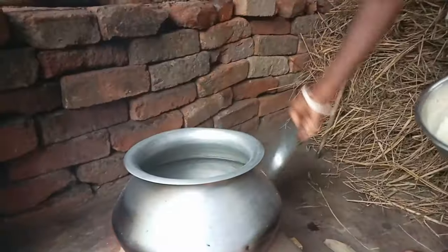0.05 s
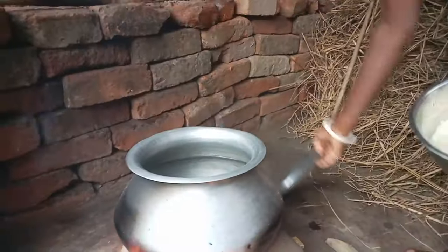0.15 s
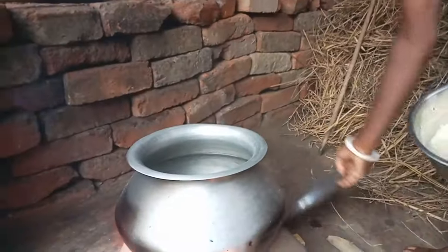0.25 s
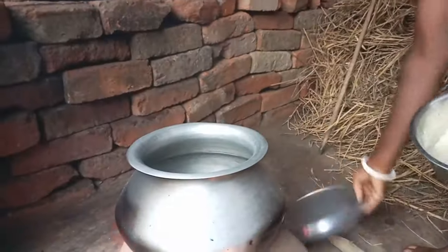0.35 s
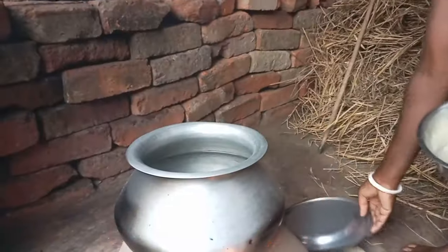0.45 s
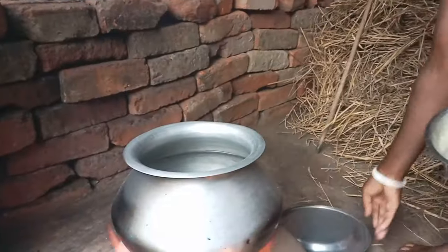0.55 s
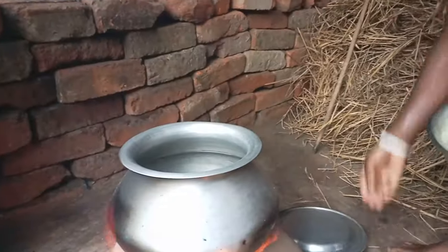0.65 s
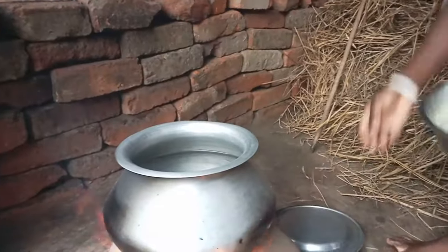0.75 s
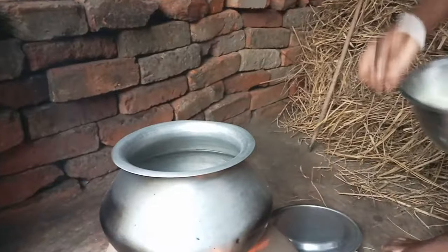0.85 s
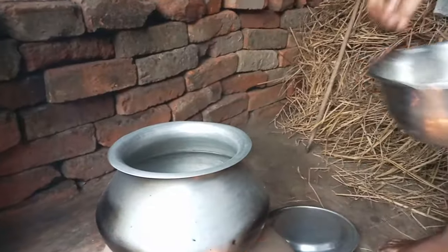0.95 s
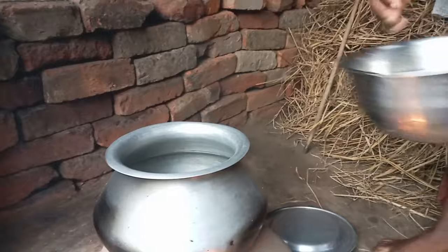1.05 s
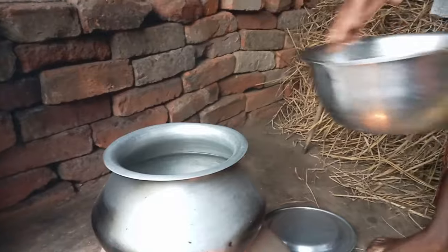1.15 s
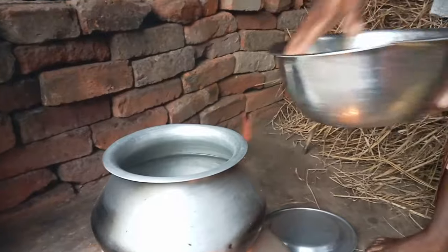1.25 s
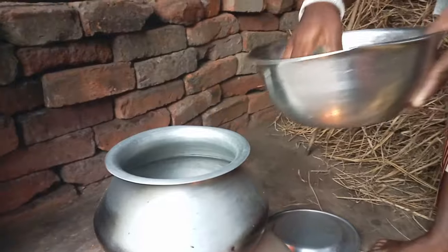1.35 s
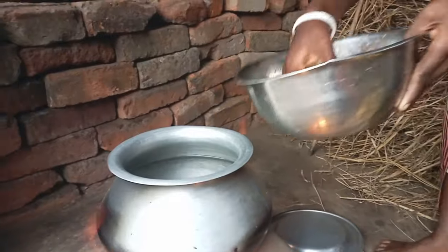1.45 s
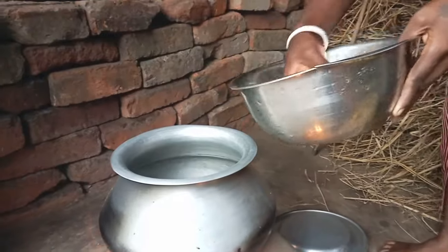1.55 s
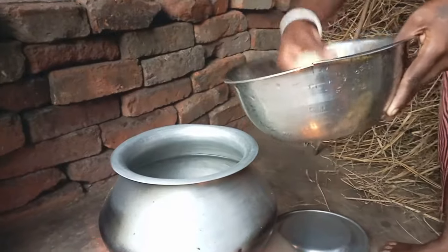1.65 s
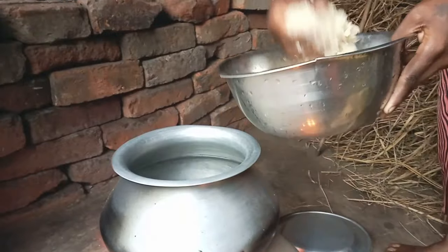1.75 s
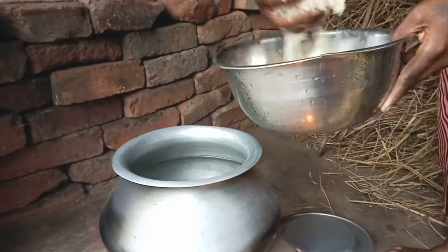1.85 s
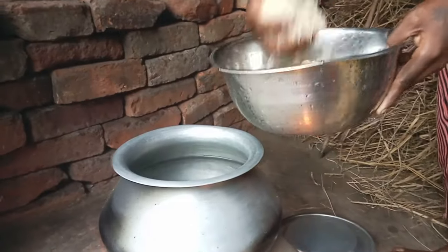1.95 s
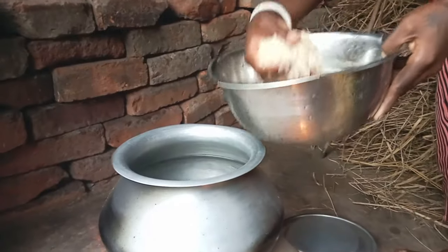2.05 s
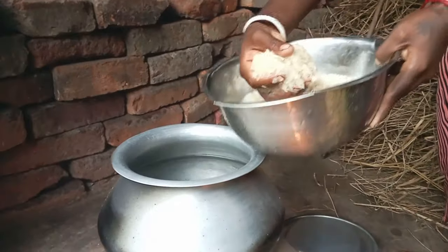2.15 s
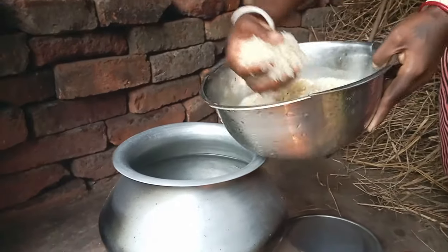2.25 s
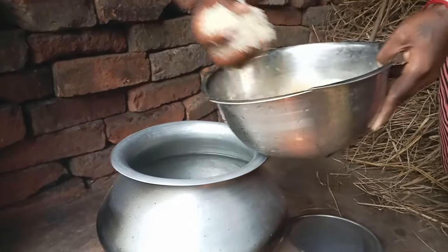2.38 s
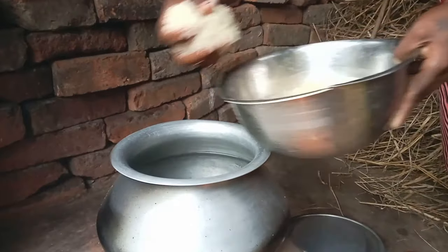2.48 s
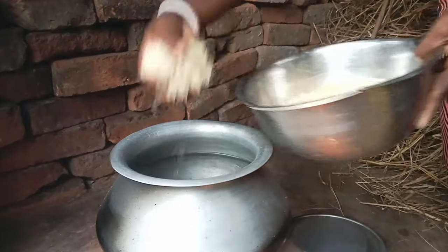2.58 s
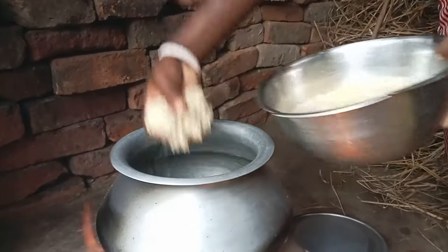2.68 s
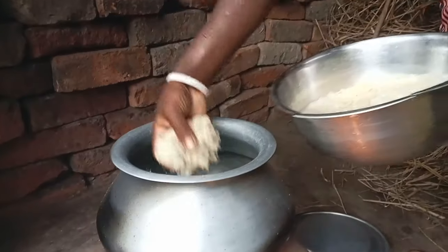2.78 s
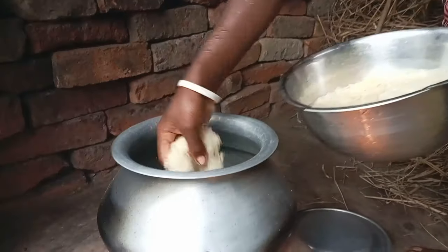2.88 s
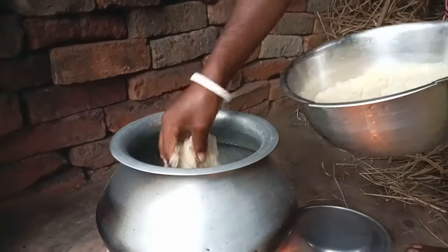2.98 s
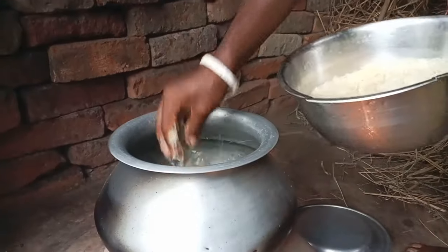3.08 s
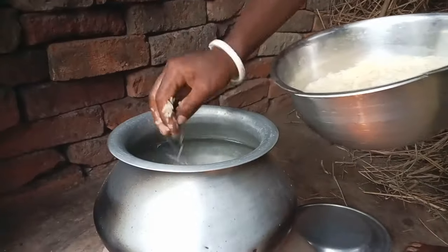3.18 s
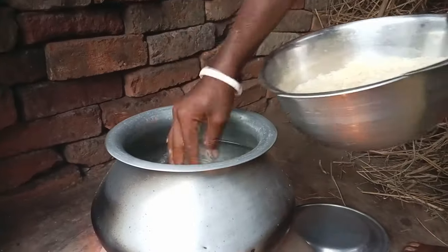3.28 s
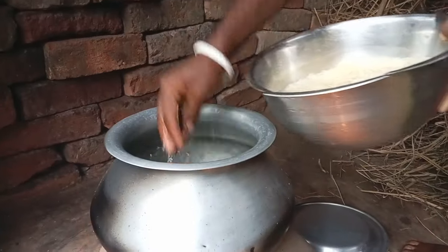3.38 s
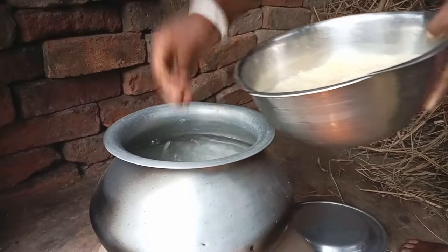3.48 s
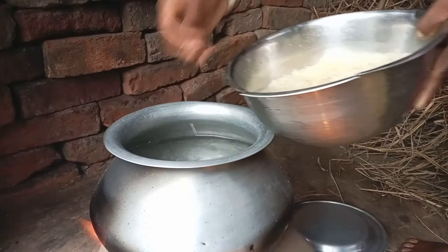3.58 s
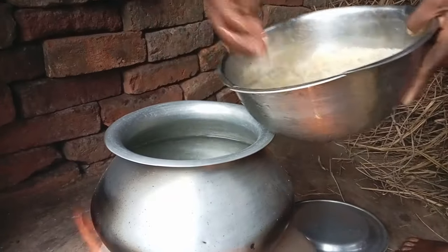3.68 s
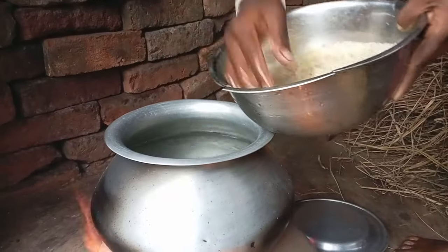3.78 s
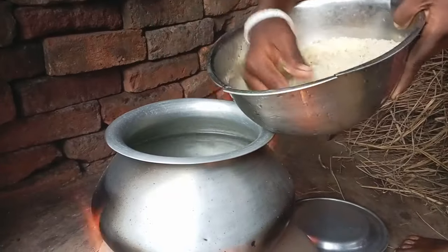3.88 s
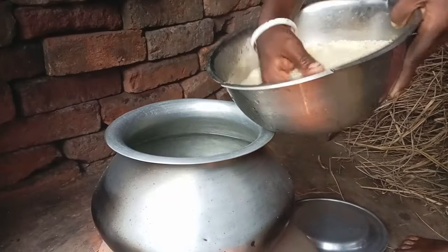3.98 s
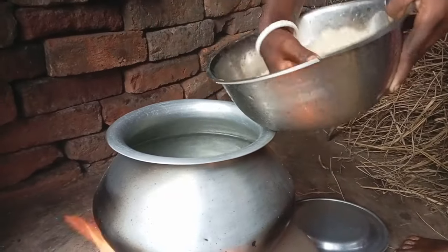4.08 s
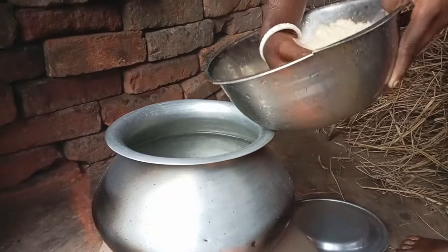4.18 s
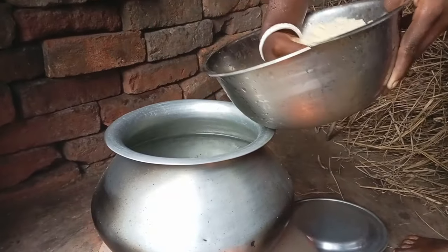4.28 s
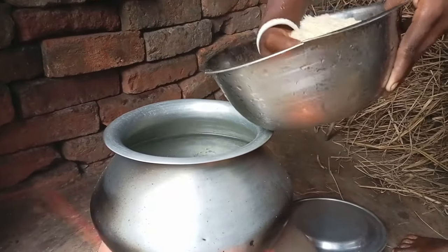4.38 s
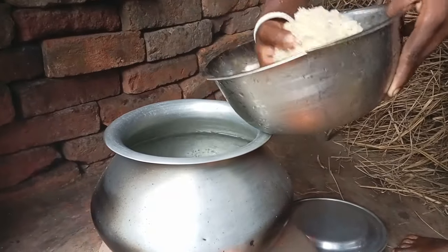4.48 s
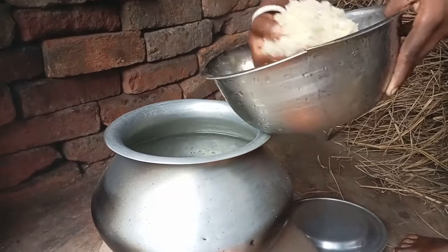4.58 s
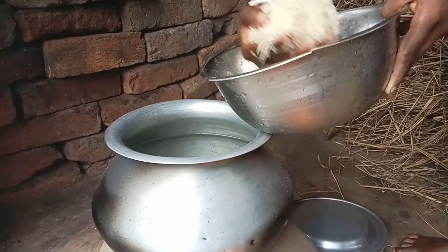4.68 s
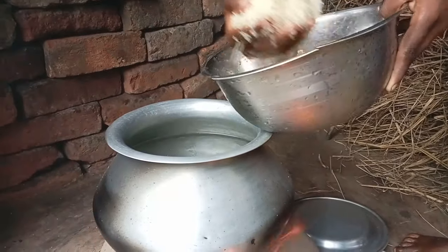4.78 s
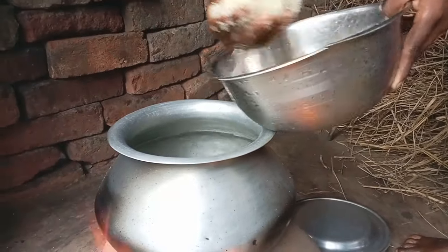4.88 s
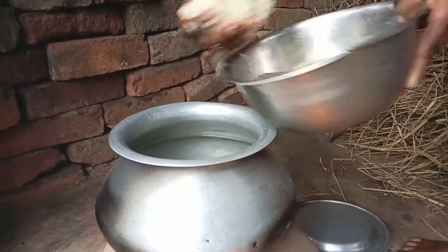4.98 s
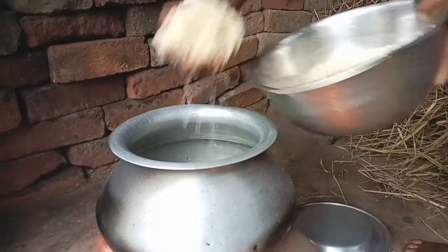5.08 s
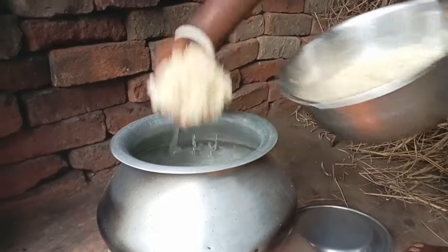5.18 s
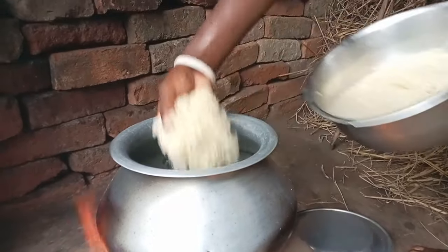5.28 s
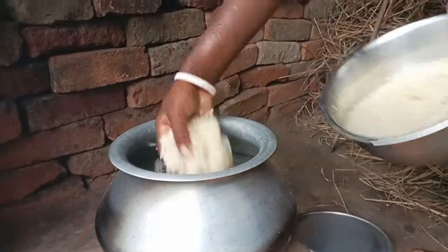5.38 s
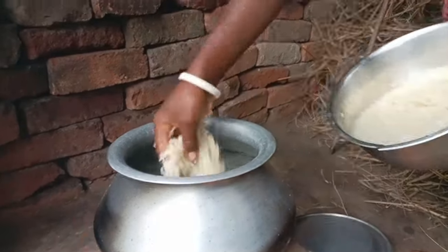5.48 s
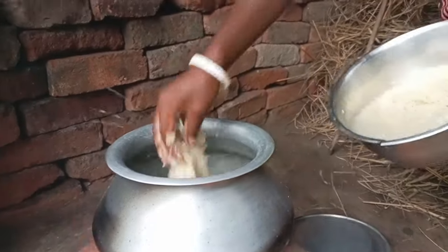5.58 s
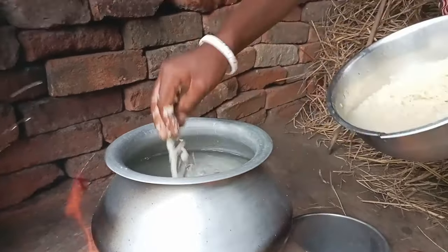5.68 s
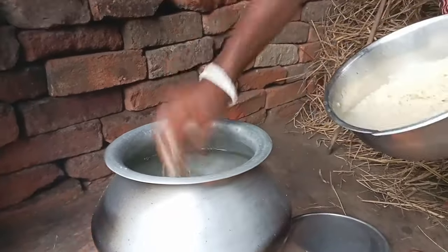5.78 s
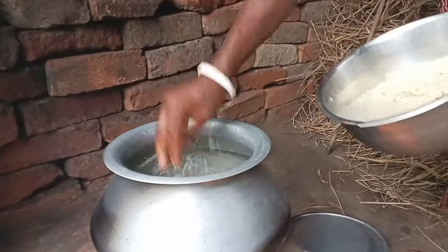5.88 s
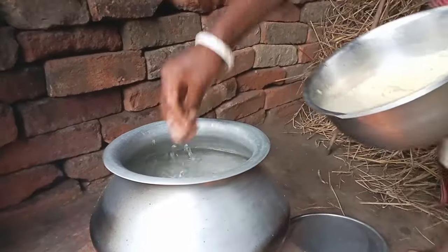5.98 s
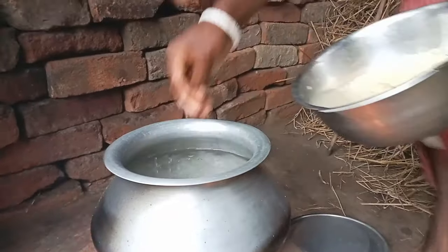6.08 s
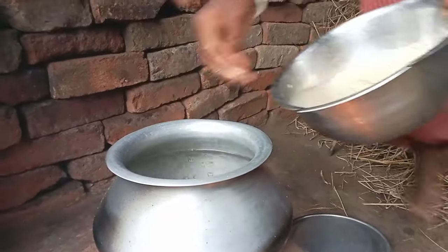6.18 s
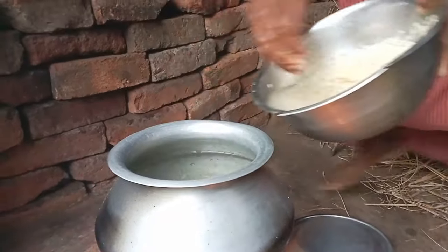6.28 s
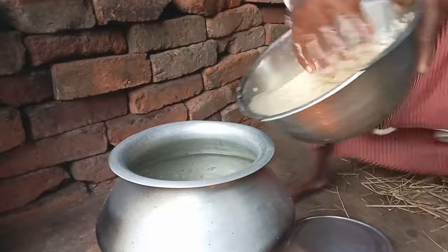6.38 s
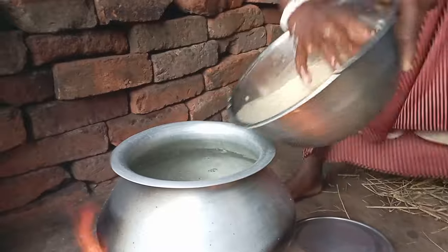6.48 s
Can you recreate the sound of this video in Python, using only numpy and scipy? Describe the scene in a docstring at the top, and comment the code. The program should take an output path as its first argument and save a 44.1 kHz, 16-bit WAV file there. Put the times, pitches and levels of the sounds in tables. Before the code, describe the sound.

Close to the microphone, a metal lid knocks the pot at 0.1 s, then hits the earth floor at about 0.45 s with a loud, noisy clank, bouncing and settling by 0.7 s. Low fire rumble and gentle hiss continue throughout. From 1.2 s a hand rustles softly in wet rice, with small ticks, drips and faint bowl touches. Around 2.8-3.0 s a handful enters the water with light, crisp splats; drips, little plops and runoff follow until 3.9. At 4.3 a bangle clinks the steel bowl sharply, then grains rustle and spatter. From 5.2 to 5.8 comes the fullest splash: dense wet splats, bright spray and rounded bubble plops. Drips thin out, then a sharp wet slap and bowl knock arrive at 6.4. Soft low thuds sound far off near 0.9, 2.6, 4.3 and 6.1, with faint hoots at 2.4 and 3.4. Dull, short brick echoes.

```python
"""A metal lid knocks its pot and is dropped on the earth floor, where it bounces: ringing modes and noisy cracks.
Near by, a hand scoops wet rice from a steel bowl into water: rustling clicks, noise splats, gliding bubble tones,
and a bangle that rings the bowl's modes. A brick corner gives the near sounds a short tail of dull echoes.
A wood fire rumbles and hisses as bands of noise; far off, low notes thud at a slow, even pace and faint hoots sound."""
import sys
import numpy as np
from scipy import signal
from scipy.fft import rfft, irfft
from scipy.io import wavfile

SR = 44100
rng = np.random.default_rng(int(sys.argv[2]) if len(sys.argv) > 2 else 0)


def inscribe(sig):
    """Save sig as 16-bit PCM at rate SR to the path in sys.argv[1].

    A 1-D sig is mono; a 2-D sig holds one channel per row.
    Samples are clipped to [-1, 1] before scaling.
    """
    pcm = np.round(np.clip(np.atleast_2d(sig).T, -1, 1) * 32767)
    wavfile.write(sys.argv[1], SR, pcm.astype(np.int16))


N = 288414


def from_db(db):
    """Decibels to gain."""
    return 10 ** (np.asarray(db) / 20)


def rms_one(x):
    """Scaled to rms 1."""
    return x / np.sqrt(np.mean(x ** 2) + 1e-20)


def time_axis(length_s):
    """Seconds from the start of a sound."""
    return np.arange(round(length_s * SR)) / SR


def add(out, s, sound):
    """Mixes a sound in at a time in seconds."""
    i = round(s * SR)
    out[i:i + len(sound)] += sound[:N - i]


def dying(t, t60):
    """Exponential decay by 60 dB in t60 seconds, t60 kept between 3 ms and 3 s."""
    return from_db(-60 * t / np.clip(t60, .003, 3))


def at_hz(points, hz):
    """A spectrum in dB read on a log-frequency axis."""
    point_hz, point_db = np.array(points).T
    return np.interp(np.log(hz), np.log(point_hz), point_db)


def colour(x, points):
    """Minimum-phase filter with the given spectrum, so that nothing sounds early."""
    size = 4096
    bin_hz = np.arange(size + 1) * SR / 2 / size
    cepstrum = irfft(np.log(from_db(at_hz(points, np.maximum(bin_hz, 1)))))
    # folding the cepstrum onto positive time makes the phase minimal
    cepstrum[1:size] *= 2
    cepstrum[size + 1:] = 0
    response = irfft(np.exp(rfft(cepstrum)))[:size]
    return signal.oaconvolve(x, response)[:len(x)]


def drift(rate):
    """Slow random wander of spread 1; a higher rate wanders faster."""
    r = np.exp(-80 * np.pi * rate / SR)   # one step is 40 samples
    noise = rng.standard_normal(N // 40 + 2002)
    slow = signal.lfilter([1], [1, -2 * r, r * r], noise)[2000:]
    return np.interp(np.arange(N) / 40, np.arange(len(slow)), rms_one(slow - slow.mean()))


def roughness(shape):
    """Low-passed noise that makes a ring uneven."""
    return signal.lfilter([.03], [1, -.97], rng.standard_normal(shape))


def grains(per_s, uneven_db, clump_db, clump_rate):
    """Random clicks of uneven size and either sign that come in clumps."""
    sizes = from_db(uneven_db * np.minimum(rng.exponential(1, N), 5)) * rng.choice([-1, 1], N)
    strikes = rng.random(N) < per_s / SR
    return sizes * strikes * from_db(clump_db * drift(clump_rate))


def bubbles(per_s, low_hz, high_hz, cycles):
    """Random bursts dealt to 12 resonators that each fall 60 dB in the given cycles; rms 1."""
    clicks = grains(per_s, uneven_db=2.5, clump_db=-1.0, clump_rate=54) + 1e-18
    dealt = rng.integers(0, 12, N)
    out = 0
    for k, hz in enumerate(np.geomspace(low_hz, high_hz, 12)):
        r = from_db(-60 * hz / (cycles * SR))
        w = 2 * np.pi * hz / SR
        own_clicks = clicks * (dealt == k) + 1e-18
        out = out + signal.lfilter([0, np.sin(w)], [1, -2 * r * np.cos(w), r * r], own_clicks)
    return rms_one(out)


def soft_tone(length, hz):
    """A sine that swells and fades over its length in seconds."""
    t = time_axis(length)
    return np.sin(2 * np.pi * hz * t) * np.sin(np.pi * t / length) ** .7


# The lid's modes. Each row: pitch in Hz, level knocked on the rim in dB, level dropped flat in dB, t60 in s.
LID_MODES = [(163.5, -8.5, -35, 0.2), (222.7, -8.5, -34, 0.087), (270.7, -8, -32, 0.18),
             (359, -11.5, -24.5, .15), (523, -6.5, 0, 0.076), (678.5, 0.5, -1, 0.29),
             (907, -33.5, -40, 0.74), (1000, -27, -43, 0.32), (1080, -15, -9.5, 0.075),
             (1204, -22.5, -6.5, 0.22), (1385, -44.5, -45.5, 0.89), (1546, -40.5, -18.5, 0.16),
             (1730, -29.5, -42, 0.56), (1815, -50, -37, 0.58), (1880, -63.5, -36, 0.99),
             (2040, -52.5, -30.5, 0.5), (2370, -51.5, -34.5, 0.85), (2510, -38.5, -36, 0.16),
             (2880, -38, 0.5, 0.1), (3040, -33.5, -12.5, 0.17), (3063, -39, -26, 0.52),
             (3327, -46.5, -31.5, 0.033), (3381, -42, -32.5, 0.31), (3720, -44, -5, 0.11),
             (4020, -43, -25.5, 0.22), (4130, -39.5, -28.5, 0.17), (4880, -59.5, -27, 0.07),
             (5640, -54, -43, .08)]
# The lid's contacts. Each row: start in seconds, ring level in dB, flatness from 0 to 1,
# tilt in dB per octave, crack level in dB, swell in s (at 683 Hz), time until the next touch chokes the ring in s.
LID_CONTACTS = [(0.1226, -9, 0.05, 4, -16, 0.00015, 0.11), (.222, -35.5, 0.9, 0.5, -50, 0.0043, 0.055),
                (0.273, -32, 0.41, 7.5, -48, 0.0036, 0.0074), (0.463, 1, 0.58, 2.5, 4, 0.0068, 0.058),
                (.521, -13.5, 0.8, 3.5, -2, 0.00079, 0.012), (.527, -15.5, 0.81, 6, 0.5, 0.0047, 0.014),
                (.548, -11.5, 0.8, -1.5, -9.5, 0.0041, 0.033), (.612, -22, 0.5, 4.5, -44, 0.0044, 0.054)]
CRACK_SPECTRUM = [(70, -40.5), (250, -13), (700, -4.5), (2200, -22.5), (3300, 3.5), (5000, -14.5),
                  (8000, -37.5), (11000, -36), (16000, -43)]   # (Hz, relative dB)


def lid():
    """Each contact cracks and rings the modes; a touch damps mostly the low modes, the high ones beat."""
    out, t = np.zeros(N), time_axis(.7)
    hz, rim_db, flat_db, t60 = np.transpose(LID_MODES)[:, :, None]
    held = 1 / (1 + (hz / 1900) ** 4) * (t60 < .6)   # modes that move the lid's edge most
    for s, db, flat, tilt_db, crack_db, swell, free in LID_CONTACTS:
        blow_db = rim_db + np.clip(flat, 0, 1) * (flat_db - rim_db)
        levels = from_db(db + blow_db + tilt_db * np.log2(hz / 683))
        choke = 1 - held * 0.86 / (1 + np.exp(-(t - free) / 0.00079))
        # low modes take up the blow slowly
        rise = (1 - np.exp(-t * (hz / 683) ** 2 / max(swell, 1e-4))) ** 2
        beat_hz = .015 * hz * rng.random(hz.shape)
        beats = 1 + .7 * (hz > 1800) * np.cos(2 * np.pi * (beat_hz * t + rng.random(hz.shape)))
        tones = np.sin(2 * np.pi * (hz * t + rng.random(hz.shape)))
        rings = beats * levels * tones * dying(t, t60) * choke * rise
        snap = dying(t, 0.0094) + 0.23 * dying(t, 0.11)
        crack = colour(rng.standard_normal(len(t)) * snap, CRACK_SPECTRUM)
        add(out, s, rings.sum(axis=0) + from_db(crack_db) * crack / np.abs(crack).max())
    return out


# Splats, drips and ticks, close by. Each row: start in seconds, level in dB, centre in Hz,
# level of the low body against the centre in dB.
SPLATS = [(0.386, -37, 3920, -18), (0.9172, -34.5, 3800, -2.5), (1.1832, -25, 3800, -47),
          (1.1957, -26, 3440, -45), (1.506, -34, 4750, -21), (1.753, -27.5, 2620, -20),
          (1.8768, -37, 3680, -23.5), (2.225, -21, 3620, -18), (2.3088, -34, 3600, -12),
          (2.378, -26.5, 3730, -4.5), (2.471, -35.5, 3290, -3), (2.7864, -23, 3720, -24),
          (2.8153, -24, 3800, -44), (2.8838, -26, 4240, -26), (2.9242, -30, 4030, -49),
          (2.9502, -26, 3820, -49), (2.967, -15, 3860, -33), (3.01, -31.5, 4240, -37),
          (3.17, -27.5, 3690, -52), (3.1992, -30.5, 4430, -24), (3.477, -26, 2510, -25),
          (3.5898, -30, 4000, -19), (3.6235, -31.5, 3000, -18), (3.7072, -29.5, 4330, -24),
          (3.732, -26, 3440, -34), (3.7651, -25.5, 4000, -28), (3.9103, -33, 3800, -13),
          (4.2503, -26.5, 4600, -19), (4.3006, -10.5, 2900, -26), (4.652, -15.5, 3720, -48),
          (4.722, -18, 4000, -24.5), (4.773, -27, 3380, -28), (4.7984, -23.5, 2880, -19),
          (4.8238, -29, 3700, -36), (5.077, -35, 4700, -45), (5.0992, -13.5, 2700, -49),
          (5.2127, -16.5, 3830, -38), (5.233, -19, 4000, -35), (5.2462, -14.5, 4040, -22),
          (5.2557, -15.5, 3800, -29), (5.2614, -21, 4020, -33), (5.3408, -24.5, 3570, -32),
          (5.3564, -11.5, 2860, -4.5), (5.3874, -19, 3740, -27), (5.4236, -7.5, 3420, -14.5),
          (5.463, -16.5, 4090, -30), (5.475, -13, 3800, -41), (5.504, -17.5, 3570, -41),
          (5.5747, -18.5, 3500, -24), (5.616, -18.5, 3020, -25), (5.6167, -16, 3330, -28),
          (5.669, -23.5, 3220, -19), (5.7276, -16, 3650, -46), (5.7364, -24, 3400, -38),
          (5.7713, -20.5, 3720, -25), (6.3742, -30.5, 3730, -32), (6.398, -5, 3180, -2),
          (6.428, -23, 2670, -15)]
SPLAT_RISE_S = 0.0015
SPLAT_T60_S, SPLAT_SHORTER_PER_DB = 0.051, 0.0443   # base time at -25 dB; louder splats are shorter


def splats():
    """Each is a ragged burst, brightest around its centre, with the rising ring of a trapped bubble."""
    out, t = np.zeros(N), time_axis(.2)
    swell = np.clip(t / SPLAT_RISE_S, 0, 1) ** 2
    after = np.maximum(t - SPLAT_RISE_S, 0)
    for s, db, hz, body_db in SPLATS:
        t60 = SPLAT_T60_S * np.exp(-SPLAT_SHORTER_PER_DB * (db + 25))
        held = dying(after ** 2 / (.55 * t60), .55 * t60)   # the spatter keeps up a moment, then stops
        fade = .6 * dying(after, .2 * t60) + held + .12 * dying(after, 2 * t60)
        spectrum = [(250, body_db - 21.0), (600, body_db - 15.5), (min(1500, 0.57 * hz), body_db + 4.0),
                    (0.76 * hz, -6), (hz, 0), (1.357 * hz, -8), (max(7000, 1.4 * hz), -20),
                    (9000, -36), (14000, -30), (16500, -45)]
        burst = colour(rng.standard_normal(len(t)) * swell * fade, spectrum)
        rising_tone = np.sin(2 * np.pi * hz * (t + 1.5 * t ** 2))
        ring = .3 * rising_tone * swell * dying(after, .7 * t60)
        add(out, s - .001, from_db(db) * (burst / np.abs(burst).max() + ring))
    return out


# Fine droplets bursting, close by. Each row: start in seconds, level in dB, centre in Hz.
DROPLETS = [(2.2254, -42, 13400), (2.7236, -38, 13200), (2.767, -39, 13500), (2.813, -30.5, 12600),
            (2.8836, -30, 13100), (2.953, -33, 13100), (2.968, -32, 10350), (3.0445, -36, 10800),
            (3.171, -44.5, 13200), (3.8906, -40.5, 10400), (3.911, -31, 13000), (4.254, -26, 9840),
            (4.3011, -46, 10500), (4.6489, -34, 13500), (4.726, -40.5, 10000), (4.9008, -44, 12400),
            (5.078, -34, 12400), (5.2126, -24, 13100), (5.267, -28, 12500), (5.3423, -32, 11100),
            (5.357, -19.5, 12900), (5.422, -24, 10400), (5.464, -28, 12300), (5.5149, -27, 14300),
            (5.5882, -22, 13100), (5.653, -25, 10400), (6.0265, -36, 14600), (6.3795, -35, 13100)]


def droplets():
    """Tiny bubbles give ticks of a few milliseconds high in the treble."""
    out, t = np.zeros(N), time_axis(.02)
    for s, db, hz in DROPLETS:
        narrow = [(0.61 * hz, -30), (hz, 0), (1.5 * hz, -22)]
        envelope = dying(t, 0.009) * (1 - dying(t, 0.0046))
        tick = colour(rng.standard_normal(len(t)) * envelope, narrow)
        add(out, s - .0005, from_db(db) * tick / np.abs(tick).max())
    return out


# Plops close by, one tone per row; two rows at one time make a two-toned plop.
# Each row: start in seconds, level in dB, nominal pitch in Hz.
PLOPS = [(1.755, -34, 1820), (1.83, -41, 1700), (1.906, -39.5, 1423), (2.38, -55, 1573),
         (3.219, -31.5, 1916), (3.451, -39, 795), (3.473, -32.5, 484), (3.473, -37, 1930),
         (3.624, -44, 740), (3.715, -44, 1485), (3.837, -37, 1795), (4.241, -35, 1530), (4.241, -36, 690),
         (4.302, -34.5, 590), (5.1, -44, 1325), (5.289, -32, 737), (5.289, -33, 1230), (5.358, -18, 1400),
         (5.358, -48, 740), (5.423, -18, 670), (5.423, -25, 1340), (5.465, -25.5, 685), (5.465, -25, 1080),
         (5.588, -30.5, 735), (5.619, -29.5, 660), (5.619, -24.5, 1460), (5.695, -32.5, 1333),
         (5.788, -30, 1880)]
PLOP_T60_S, PLOP_LONGER_PER_DB = 0.03, 0.02   # decay at -30 dB; louder tones ring longer


def plops():
    """Bubbles ring while their pitch climbs towards the surface."""
    out, t = np.zeros(N), time_axis(.2)
    climb = 2 * np.pi * (.97 * t + 1.0 * t ** 2)
    for s, db, hz in PLOPS:
        t60 = PLOP_T60_S * np.exp(PLOP_LONGER_PER_DB * (db + 30))
        rough = 1 + 4.0 * roughness(len(t))   # churned water roughens them
        add(out, s - .001, from_db(db) * np.sin(hz * climb) * rough * dying(t, t60) * (1 - dying(t, 0.011)))
    return out


# The steel bowl's modes. Each row: pitch in Hz, level in dB, t60 in s.
BOWL_MODES = [(563, 14.5, 0.18), (820, 2, 0.042), (1132, -6, 0.085), (1340, -9.5, 0.082),
              (1626, -19.5, 0.13), (1800, -33.5, 0.03), (1911, -13, 0.13), (2060, -42, 0.18),
              (2370, -9, 0.045), (2690, -32.5, 0.079), (3020, -20, 0.028), (3330, 5, 0.05),
              (3400, -26, 0.033), (3800, 12.5, 0.037), (4540, -5, .06), (4730, -13, 0.065),
              (5500, -37, .15)]
# Bangle on the bowl, close by. Each row: start in seconds, level in dB, pitch the spot favours in Hz,
# spread in octaves.
BANGLE_KNOCKS = [(1.7553, -35.5, 2260, 0.49), (2.3804, -36, 1570, 0.17), (4.3012, -26, 1580, 0.93),
                 (4.313, -9.5, 1911, 0.22), (4.327, -14.5, 2540, 0.24), (5.0997, -22, 2400, 0.084),
                 (6.399, -15, 1770, 0.51), (6.4264, -42, 2490, 1.6), (6.449, -37, 2200, 0.82)]


def bowl():
    """The hand-held bowl rings briefly; where it is hit decides which modes speak."""
    out, t = np.zeros(N), time_axis(.3)
    hz, mode_db, t60 = np.transpose(BOWL_MODES)[:, :, None]
    for s, db, spot_hz, spread in BANGLE_KNOCKS:
        off_spot = np.log2(hz / spot_hz) / max(spread, .05)
        levels = from_db(db + mode_db - 6 * off_spot ** 2)
        # wet rice against the wall roughens each ring
        rough = 1 + 4.3 * roughness((len(hz), len(t)))
        rings = levels * rough * np.sin(2 * np.pi * hz * t) * dying(t, t60)
        add(out, s, rings.sum(axis=0))
    return out


# Hand in wet rice and water. Each row: time in seconds, rustle of the grains in dB, spray of the water in dB.
STIR = [(0, -49.5, -62), (.42, -46.5, -60.5), (1.12, -54, -68.5), (1.19, -44, -62), (1.27, -46, -66),
        (1.38, -51, -62), (1.6, -48.5, -71), (2.1, -53, -66.5), (2.28, -52.5, -71.5), (2.74, -50.5, -64),
        (2.959, -41, -61), (3.15, -52, -73.5), (3.2, -47, -61.5), (3.44, -54, -69), (3.49, -44.5, -62),
        (3.63, -43, -58), (3.67, -47.5, -75), (3.73, -39, -71.5), (4.1, -52, -64), (4.4, -45.5, -59.5),
        (4.6, -51.5, -64.5), (5.18, -50.5, -61), (5.24, -37, -44), (5.33, -37.5, -51), (5.42, -33.5, -51),
        (5.52, -33.5, -49), (5.65, -40.5, -53), (5.83, -47, -60), (6.37, -55, -63), (6.47, -38, -54),
        (6.54, -43, -57)]
# Tone of the rustle and of the spray. Each row: frequency in Hz, relative level in dB.
RUSTLE_SPECTRUM = [(880, -31), (1500, 9), (1780, -65), (1950, -35), (2520, -24), (2950, 8), (3800, 17),
                   (6230, -15), (6920, 0), (8160, -9), (9000, -32.5), (11700, -117), (19800, -120)]
SPRAY_SPECTRUM = [(6000, 3), (8500, -9), (10400, 11), (12000, 1), (13800, 10), (15500, -1.5), (17000, 4.5)]
TRICKLE_DB = -11   # against the rustle
SLOSH_DB, SLOSH_FOLLOWS = -63, 0.24   # level when the spray is at -65 dB; share of the spray's swing


def stirring():
    """Grains rub and water trickles between them; with the spray the water also sloshes in small bubbles."""
    s, *columns = np.transpose(STIR)
    rustle_db, spray_db = [np.interp(np.arange(N) / SR, s, c) for c in columns]
    slosh_db = SLOSH_DB + SLOSH_FOLLOWS * (spray_db + 65)
    clicks = grains(6000, uneven_db=2.5, clump_db=2.0, clump_rate=50)
    fizz = rms_one(colour(clicks, RUSTLE_SPECTRUM)) + from_db(-4) * bubbles(900, 3000, 6090, cycles=134)
    trickle = from_db(TRICKLE_DB + 4.1 * drift(4.0)) * bubbles(400, 2186, 3300, cycles=23)
    slosh = from_db(slosh_db + 1.46 * drift(9.2)) * bubbles(400, 647, 2050, cycles=21.0)
    rustle = from_db(rustle_db) * (rms_one(fizz) + trickle)
    spray = from_db(spray_db) * rms_one(colour(clicks, SPRAY_SPECTRUM))
    return rustle + slosh + spray


# Water running off the hand. Each row: start in seconds, length in seconds, level in dB.
RUNOFF = [(1.499, 0.17, -62.5), (3.215, .08, -53.5), (3.47, 0.17, -46), (3.823, 0.13, -56),
          (5.239, .06, -41), (5.358, .28, -52), (6.426, 0.049, -37)]
RUNOFF_EDGE_S = 0.01


def runoff():
    """Short streams patter into the water as a steady run of small bubbles."""
    t = np.arange(N) / SR
    gate = 0
    for s, length, db in RUNOFF:
        to_edge = np.minimum(t - s, s + length - t)
        gate = gate + from_db(db) * np.clip(to_edge / RUNOFF_EDGE_S, 0, 1)
    return gate * bubbles(900, 2325, 3340, cycles=63)


def walls(x, t60):
    """Brick corner: a short tail of dense dull echoes."""
    t = time_axis(.3)
    dull_noise = signal.lfilter([.5], [1, -.5], rng.standard_normal(len(t)))
    echoes = dull_noise * dying(t, t60) * (t > .003)
    return signal.oaconvolve(x, echoes / np.sqrt(np.sum(echoes ** 2)))[:N]


# Rumble and hiss of the wood fire. Each row: frequency in Hz, relative level in dB.
FIRE_SPECTRUM = [(15, 10.5), (25, -15.5), (120, 5), (161, 1.5), (363, -14), (545, -12.5), (1130, -23),
                 (2280, -15), (3620, -4), (4490, -16.5), (5430, -16.5), (9320, -33.5), (10400, -33),
                 (14000, -29.5), (16000, -31.5)]
FIRE_DB = -48   # rms


def fire(lumps_db, flicker_db):
    """Half-octave bands of noise; the low flames come in lumps, the hiss flickers a little."""
    out, edges = 0, 22 * 2 ** np.arange(0, 9.9, .5)
    white = rng.standard_normal((2, N))   # neighbouring bands take turns
    lumps, together = drift(7.0), drift(2.5)
    for k, (low, high) in enumerate(zip(edges, edges[1:])):
        band = signal.sosfilt(signal.butter(2, [low, high], "band", fs=SR, output="sos"), white[k % 2])
        low_share = 1 / (1 + (low / 300) ** 2) / (1 + (60 / low) ** 2)
        lump_swing_db = lumps_db * low_share * (0.6 * lumps + 0.22 * drift(6.4))
        flicker_swing_db = flicker_db * (0.2 * together + drift(8.8))
        out = out + band * from_db(lump_swing_db + flicker_swing_db)
    return from_db(FIRE_DB) * rms_one(colour(out, FIRE_SPECTRUM))


# Thuds, far off. Each row: start in seconds, level in dB.
THUDS = [(0.86, -37.5), (2.627, -39), (4.342, -34.5), (6.073, -39)]
# Modes of a thud. Each row: settled pitch in Hz, level in dB, t60 in s.
THUD_MODES = [(372, 9.5, 0.15), (528, -13, 0.53)]
THUD_SAG, THUD_SAG_S = 0.12, 0.016   # pitch starts high by this share and settles with this time constant
ANSWER_S, ANSWER_DB = .07, -8.5   # delay and level of the answer


def thuds():
    """A low note that sags after a soft onset, then a hollow answer from a far wall."""
    out, t = np.zeros(N), time_axis(.6)
    hz, mode_db, t60 = np.transpose(THUD_MODES)[:, :, None]
    bent = t + THUD_SAG * THUD_SAG_S * (1 - np.exp(-t / THUD_SAG_S))
    modes = from_db(mode_db) * np.sin(2 * np.pi * hz * bent) * dying(t, t60)
    thud = modes.sum(axis=0) * (1 - dying(t, 0.055))
    for s, db in THUDS:
        add(out, s - .004, from_db(db) * thud)
        add(out, s + ANSWER_S, from_db(db + ANSWER_DB) * soft_tone(0.066, 379))
    return out


# Faint hoots, far off. Each row: start in seconds, length in seconds, pitch in Hz, level in dB.
HOOTS = [(2.42, 0.15, 484, -56.5), (3.4, 0.017, 466, -47), (3.473, 0.043, 478, -44.5)]


def hoots():
    """Short soft notes, perhaps a dove."""
    out = np.zeros(N)
    for s, length, hz, db in HOOTS:
        add(out, s, from_db(db) * soft_tone(length, hz))
    return out


def scene():
    """Near sources with their echoes, over fire and the far sounds; the lid is given a fainter echo."""
    near = splats() + droplets() + plops() + bowl()
    plate = lid()
    echoes = from_db(-7.0) * walls(near + from_db(-3) * plate, t60=0.14)
    water = stirring() + runoff()
    background = fire(lumps_db=3.0, flicker_db=1.8) + thuds() + hoots()
    return (near + plate + echoes + water + background)[None]


CUTOFF_HZ = 16400


def record(dry):
    """At the microphone, gain control ducks after loud peaks and recovers; peaks are rounded, both ends cut."""
    fall = np.arange(N) / SR * 60.0   # release in dB per second
    level_db = 20 * np.log10(np.abs(dry) + 1e-6)
    held_db = np.maximum.accumulate(level_db + fall, axis=1) - fall
    # above -20 dB, 0.15 dB of ducking per dB, smoothed
    duck_db = signal.lfilter([.002], [1, -.998], .15 * np.maximum(held_db + 20, 0))
    rounded = .9 * np.tanh(dry * from_db(-duck_db) / .9)
    wet = signal.sosfilt(signal.butter(2, 45, "high", fs=SR, output="sos"), rounded)
    return signal.sosfilt(signal.cheby2(14, 70, CUTOFF_HZ, fs=SR, output="sos"), wet)


dry = scene()
out = record(dry)
inscribe(out)
```